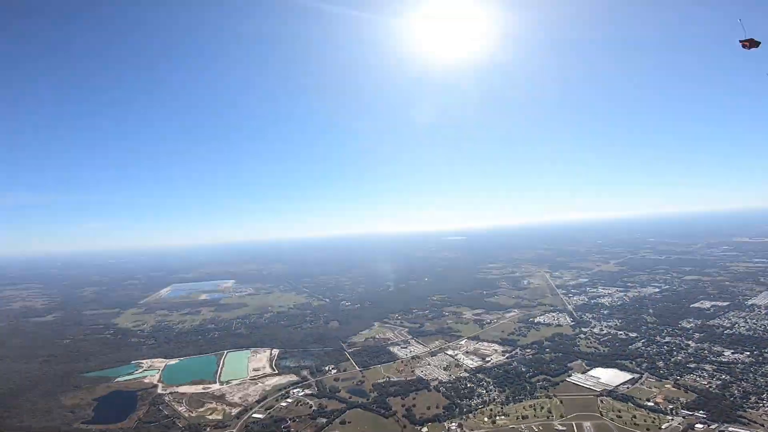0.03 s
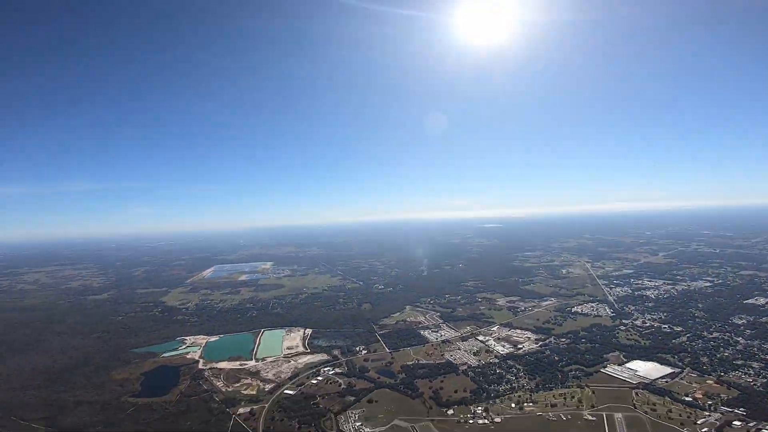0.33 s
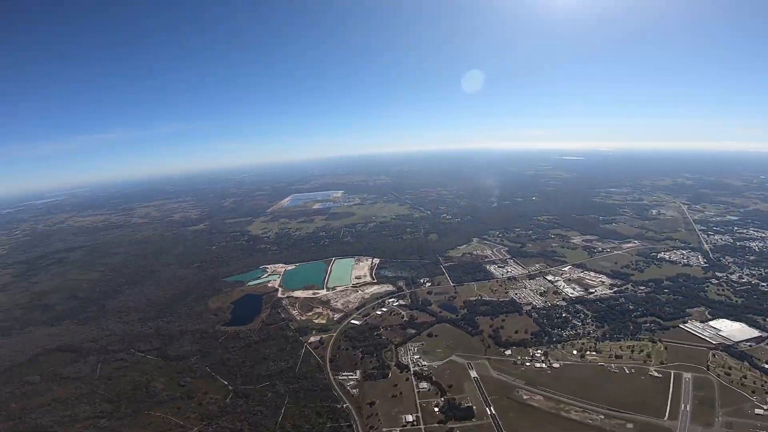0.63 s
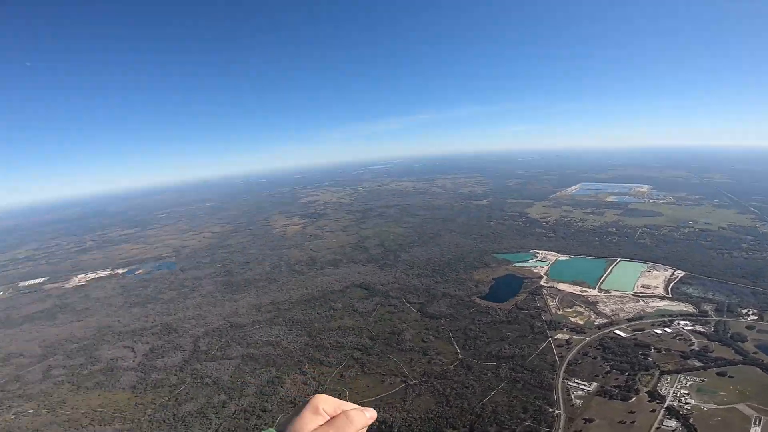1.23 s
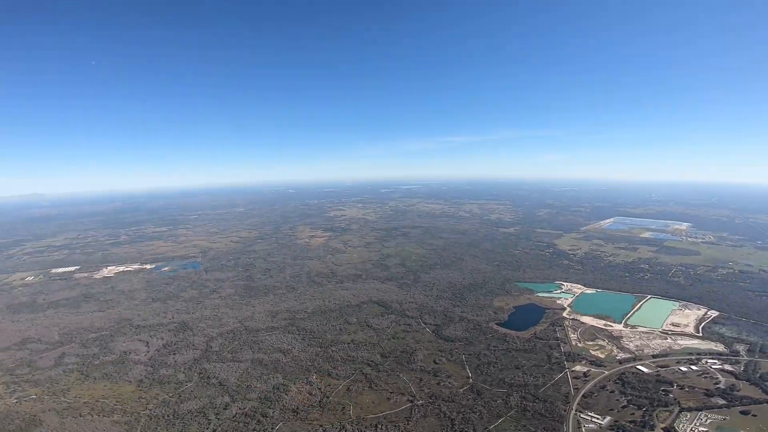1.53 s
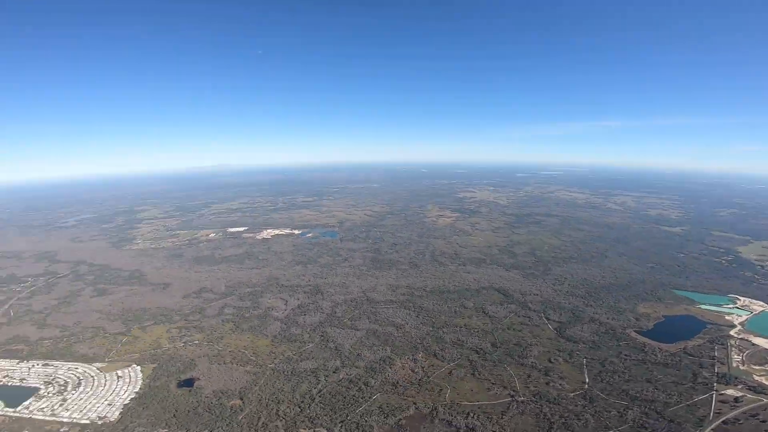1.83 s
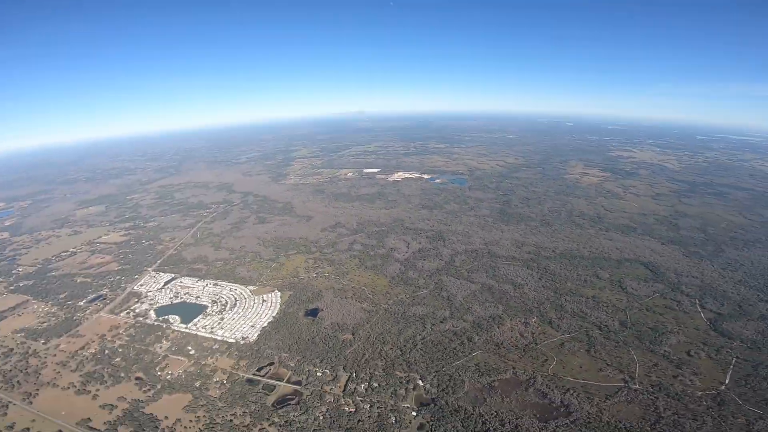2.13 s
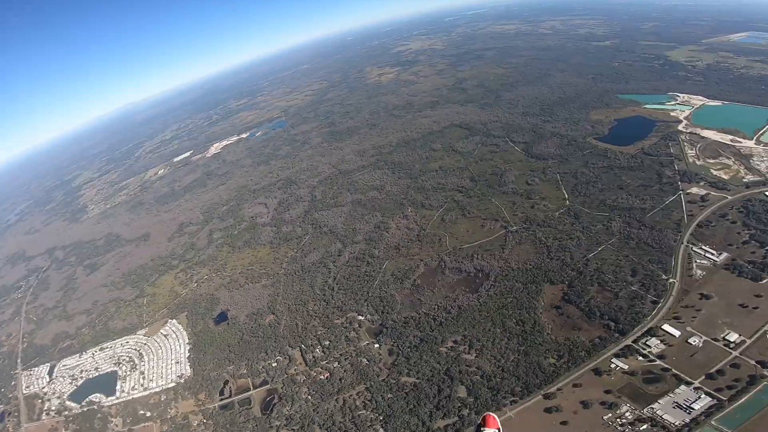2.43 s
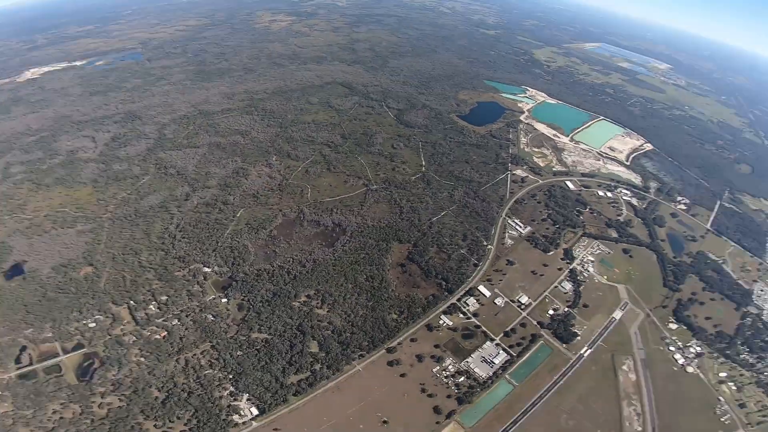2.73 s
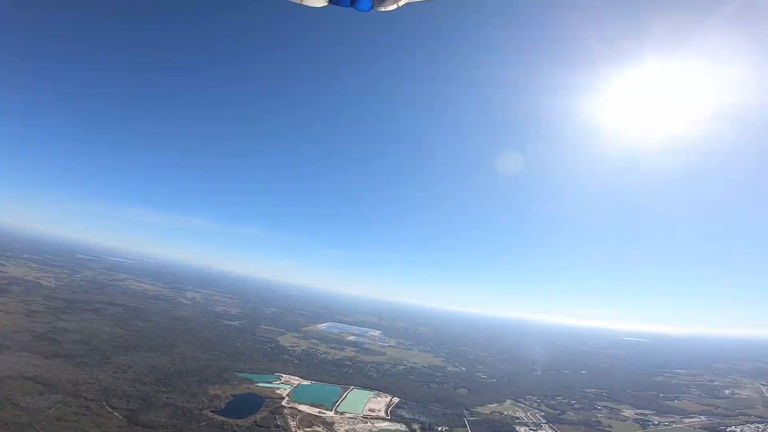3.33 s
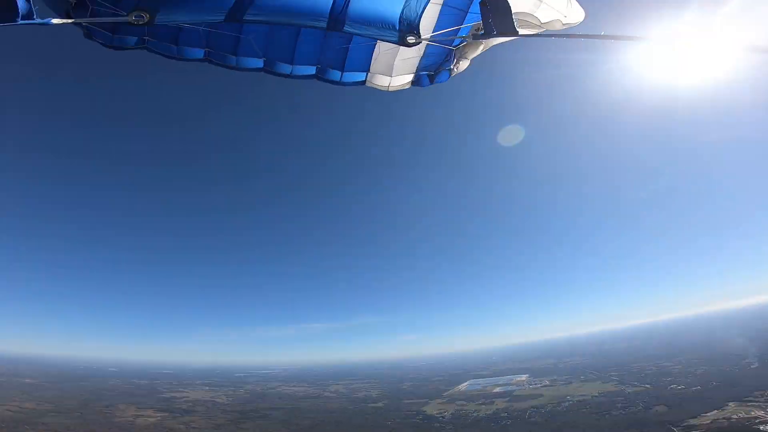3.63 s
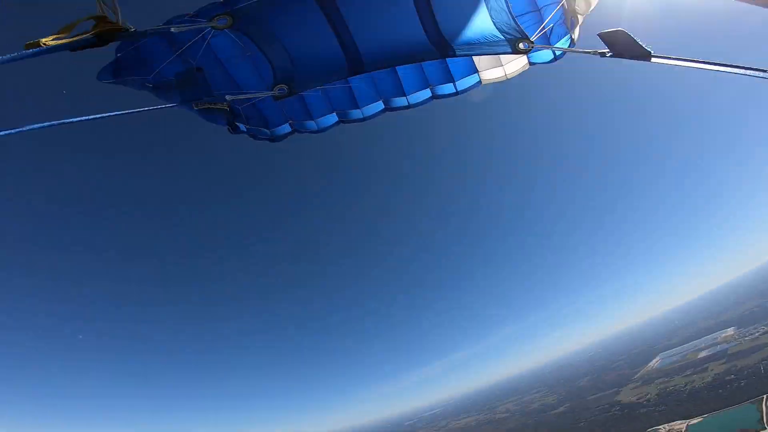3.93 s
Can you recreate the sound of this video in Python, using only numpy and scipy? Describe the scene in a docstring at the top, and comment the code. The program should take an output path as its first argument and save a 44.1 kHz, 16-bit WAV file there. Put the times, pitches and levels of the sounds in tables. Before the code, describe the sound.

Wind buffets a microphone high in open air, with low thumps, ragged flutter and tiny pops. After a few faint fabric rubs it drops into a brief, hollow lull, then rushes back as the parachute dives.

```python
"""In open air under a parachute, swinging through a turn: one microphone on a small carried camera.
Eddies thump and roar right on the mic; gusts tear at it, spit as they break on the port and whistle
as they slide off. Harness fabric scrapes past, close by. The port falls into the lee for a moment,
leaving faint hollow air tones; then the dive picks up speed and the rush swells again."""
import sys
import numpy as np
from scipy import signal
from scipy.fft import rfft, irfft
from scipy.io import wavfile
from scipy.ndimage import uniform_filter1d

SR = 44100
rng = np.random.default_rng(int(sys.argv[2]) if len(sys.argv) > 2 else 0)


def dump_mix(stems):
    """Bounce the given channels to the path in sys.argv[1] as a 16-bit WAV at rate SR."""
    frames = np.atleast_2d(stems).T  # one column per channel
    limited = np.clip(frames, -1, 1)  # hard clip at full scale
    pcm = np.round(limited * 32767).astype(np.int16)
    wavfile.write(sys.argv[1], SR, pcm)


N = 176400
TIME = np.arange(N) / SR


def from_db(db):
    """Decibels to gain."""
    return 10 ** (np.asarray(db) / 20)


def rms_one(x):
    """Scale to unit power."""
    return x / np.sqrt(np.mean(x ** 2) + 1e-20)


def in_time(rows):
    """Join (time [s], value) points into a curve at every sample."""
    return np.interp(TIME, *np.transpose(rows))


def butter(x, order, hz, kind):
    """Causal low- or high-pass."""
    return signal.sosfilt(signal.butter(order, min(hz, .45 * SR), kind, fs=SR, output="sos"), x)


def drift(hz):
    """Smooth random wander up to about this rate; rms 1."""
    return rms_one(butter(rng.standard_normal(N + SR), order=2, hz=hz, kind="low")[SR:])


def noise(colour):
    """Noise with a spectrum of (frequency [Hz], relative level [dB]) points; rms 1."""
    hz, db = np.transpose(colour)
    bin_hz = np.maximum(np.arange(N // 2 + 1) * SR / N, 1)
    gain = from_db(np.interp(np.log(bin_hz), np.log(hz), db)) * (bin_hz > 10)
    return rms_one(irfft(rfft(rng.standard_normal(N)) * gain, N))


def evened(x, span_s):
    """Hold the power near 1 over this span, leaving the quicker lumps."""
    size = max(int(span_s * SR), 2)
    power = uniform_filter1d(uniform_filter1d(x ** 2, size), size)
    return x / np.sqrt(np.abs(power) + 1e-12)


def swell(peak_s, length_s, db):
    """A bell-shaped rise and fall of gain."""
    return from_db(db) * np.exp(-(2 * (TIME - peak_s) / length_s) ** 2)


def air_tone(glide, q):
    """Smooth flow noise in a gliding, steep-sided resonance; q is centre over width."""
    s, hz, db = np.transpose(glide)
    flow, tone, state = rng.standard_normal(N), np.zeros(N), np.zeros((2, 2))
    for block in np.array_split(np.arange(N), N // 128):
        centre_hz = np.interp(TIME[block[0]], s, hz)
        radius = np.exp(-np.pi * centre_hz / q / SR)
        poles = [1, -2 * radius * np.cos(2 * np.pi * centre_hz / SR), radius ** 2]
        band_pass = [(1 - radius ** 2) / 2, 0, (radius ** 2 - 1) / 2] + poles
        low_pass = [sum(poles), 0, 0] + poles
        tone[block], state = signal.sosfilt([band_pass, low_pass], flow[block], zi=state)
    softened = butter(tone, order=3, hz=6570, kind="low")
    return from_db(np.interp(TIME, s, db)) * evened(softened, span_s=0.15)


def open_air():
    """Air around the camera: two hollow tones in the lull, then a swish and the smooth rush of the dive."""
    # the rush as the dive gathers speed: (time [s], level [dB])
    rush_level = [(3.0, -76), (3.15, -61), (3.28, -51.5), (3.4, -42.5), (3.54, -41), (3.68, -45.5),
                  (4, -45)]
    # its spectrum: (frequency [Hz], relative level [dB])
    rush_colour = [(500, -8.5), (1100, 8.5), (1700, 5), (2400, -8), (2900, -1), (4000, -5), (5500, -11),
                   (7000, -17.5), (9000, -23), (11000, -35.5), (15000, -67.5)]
    # a swish that sinks as the flow swings onto the port: (time [s], centre [Hz], level [dB])
    swish = [(3.28, 3030, -88), (3.35, 2870, -48.5), (3.39, 2760, -43), (3.43, 1460, -37),
             (3.47, 1090, -33), (3.55, 1050, -41.5), (3.62, 755, -32), (3.72, 600, -84)]
    # hollow lower tone: (time [s], centre [Hz], level [dB])
    lower_tone = [(2.88, 560, -58), (2.96, 670, -57), (3.02, 790, -51), (3.09, 770, -59), (3.2, 736, -63),
                  (3.27, 730, -47), (3.36, 740, -73)]
    # airy upper tone: (time [s], centre [Hz], level [dB])
    upper_tone = [(2.8, 1980, -69), (2.99, 2200, -64), (3.27, 2370, -57), (3.36, 2380, -50)]
    rush = from_db(in_time(rush_level)) * noise(rush_colour)
    return rush + air_tone(swish, q=1) + air_tone(lower_tone, q=3.2) + air_tone(upper_tone, q=3.2)


def scrapes(width_octaves=0.4):
    """Harness fabric rubs past the camera in short, bright strokes, each in its own band."""
    # fabric strokes: (peak time [s], length [s], level [dB], centre [Hz])
    strokes = [(2.391, 0.056, -48, 2850), (2.476, 0.013, -48, 4200), (2.531, 0.014, -46, 4050),
               (2.718, 0.009, -58, 3850), (2.845, 0.0084, -48, 1790), (2.875, .018, -62.5, 4130),
               (3.416, .03, -52, 4200)]
    edge_ratio = 2 ** (width_octaves / 2)
    friction, out = rng.standard_normal(N), np.zeros(N)
    for peak_s, length_s, db, hz in strokes:
        band = butter(friction, order=6, hz=hz * edge_ratio, kind="low")
        band = butter(band, order=6, hz=hz / edge_ratio, kind="high")
        out += swell(peak_s, length_s, db) * evened(band, span_s=0.005)
    return out


def whistles(fall_octaves_per_s=2.6):
    """A narrow resonance sinks in pitch as a gust slides off the port."""
    # breathy whistles: (peak time [s], length [s], level [dB], pitch at the peak [Hz])
    breaths = [(1.283, 0.077, -38.5, 1460), (1.688, .085, -37.5, 1000)]
    out = np.zeros(N)
    for peak_s, length_s, db, hz in breaths:
        glide = [(peak_s + dt, hz * 2 ** (-fall_octaves_per_s * dt), 0) for dt in (-length_s, length_s)]
        out += swell(peak_s, length_s, db) * air_tone(glide, q=3.5)
    return out


def spits(pivot_hz=1000):
    """Eddies and fabric slap the port: puffs only milliseconds long, dull or crisp."""
    # slaps: (peak time [s], length [s], level [dB], tilt about the pivot [dB/octave])
    slaps = [(0.223, 0.0025, -12.5, -0.5), (.328, .006, -21, -2), (0.397, 0.0049, -11.5, -9.5),
             (0.423, 0.0056, -17, -4), (0.442, 0.0062, -22, -3), (0.494, .012, -15.5, -5.5),
             (0.528, .008, -24, -0.5), (.545, 0.0082, -14, -4), (0.596, .0035, -12, -4.5),
             (0.6227, 0.0044, -17, -3.3), (0.701, 0.0028, -21, -2), (0.725, 0.0054, -22, -3.5),
             (.962, 0.0063, -19.5, -1), (1.291, .004, -31.5, 0), (1.4035, 0.0034, -19, -7.5),
             (1.4522, 0.0057, -20.5, -0.6), (1.476, 0.014, -25, -4), (1.521, 0.0038, -36, 3.5),
             (1.553, 0.0058, -25, 2), (1.582, 0.0044, -30, -1), (1.591, 0.0068, -26, 0),
             (1.613, 0.0065, -29, 2), (1.622, 0.0082, -27, 3), (1.665, .005, -25.5, -4),
             (1.726, .007, -27, -3.5), (1.799, 0.0064, -29, -3.5), (2.042, 0.0087, -28, -0.5),
             (2.063, 0.0019, -26.5, 3), (2.225, 0.0055, -32, 2), (2.497, 0.012, -30, -1),
             (2.562, 0.0043, -26, -4), (3.131, 0.0055, -40.5, -1), (3.547, 0.006, -25.5, 0),
             (3.755, .005, -24.5, -3.5)]
    # spectrum of a puff before its tilt: (frequency [Hz], relative level [dB])
    puff_colour = [(200, -14.5), (500, 9), (900, 2.5), (1700, -1), (2700, -8), (4000, -16), (5500, -27.5),
                   (7000, -36), (9500, -44.5), (13000, -59)]
    hz, colour_db = np.transpose(puff_colour)
    out = np.zeros(N)
    for peak_s, length_s, db, tilt in slaps:
        tilted = np.transpose([hz, colour_db + tilt * np.log2(hz / pivot_hz)])
        out += swell(peak_s, length_s, db) * evened(noise(tilted), span_s=0.0078)
    return out


def flutter(flap_hz=50, ripple_hz=193, ripple_share=0.46):
    """Eddies pass the port in uneven flaps with a fast ripple on them; a level swing in dB."""
    # unevenness of the flow, which each layer scales: (time [s], base spread [dB])
    spread = [(0, 2.5), (.45, 4), (.7, 3), (.8, 1), (1.2, 2.5), (1.35, 4), (2.35, 3.5), (2.6, 4),
              (3.35, -1), (4, 3)]
    lumps = np.sqrt(1 - ripple_share) * drift(flap_hz) + np.sqrt(ripple_share) * drift(ripple_hz)
    return in_time(spread) * 3 * np.tanh(lumps / 3)   # eases off the widest swings


def turbulence(colour, flutter_db):
    """Flow noise chopped by the passing eddies, its average power held steady."""
    return evened(noise(colour) * from_db(flutter_db), span_s=0.17)


def gusts(flutter_db):
    """Short ragged swells as the flow hits the port head on, each with its own brightness."""
    # gusts on the port: (peak time [s], length [s], level [dB], low-pass cutoff [Hz])
    blasts = [(0.023, 0.053, -17, 4350), (0.187, 0.14, -19, 1600), (0.481, 0.44, -26, 1280),
              (1.068, 0.29, -21.5, 2840), (1.212, 0.069, -21.5, 2210), (1.45, 0.013, -18, 990),
              (1.683, 0.086, -25, 1720), (1.726, 0.017, -21, 1890), (1.835, 0.034, -27.5, 1800),
              (2.028, 0.11, -28.5, 1840), (2.237, 0.048, -25.5, 1160), (2.405, 0.079, -30.5, 3000),
              (2.421, 0.0088, -19.5, 1400), (2.519, 0.06, -22.5, 1900), (3.641, 0.15, -25.5, 610),
              (3.795, 0.096, -23.5, 1500), (3.879, 0.11, -27, 655)]
    # spectrum of the flow before that low-pass: (frequency [Hz], relative level [dB])
    flow_colour = [(80, -20), (220, 4), (450, 5), (900, -4.5), (1500, -9.5), (2500, -15.5), (6000, -26.5),
                   (11000, -58)]
    flow, out = turbulence(flow_colour, flutter_db), np.zeros(N)
    for peak_s, length_s, db, cutoff_hz in blasts:
        dulled = butter(flow, order=3, hz=cutoff_hz, kind="low")
        out += swell(peak_s, length_s, db) * evened(dulled, span_s=length_s)
    return out


def airstream(flutter_db):
    """Roar, rasp and hiss of the flow right at the mic, all shaken by the same eddies."""
    # roar of the smaller eddies: (time [s], level before trim [dB])
    roar_level = [(0, -14), (.25, -18), (.37, -20.5), (.52, -14), (.64, -21.5), (.76, -13), (.92, -16.5),
                  (1.19, -13.5), (1.35, -22.5), (1.7, -19.5), (1.92, -24.5), (2.08, -18.5), (2.19, -27.5),
                  (2.33, -29), (2.42, -21.5), (2.46, -25), (2.53, -20), (2.7, -32.5), (2.77, -47),
                  (2.93, -44.5), (3.07, -70), (3.15, -43.5), (3.22, -54.5), (3.45, -30), (3.67, -16.5),
                  (3.76, -28.5), (3.88, -23.5), (4, -31)]
    # tearing rasp at the port between gusts: (time [s], level before trim [dB])
    rasp_level = [(0, -18), (0.25, -20), (0.55, -28), (0.67, -32.5), (0.76, -20.5), (0.9, -23.5),
                  (0.98, -23), (1.22, -33.5), (1.3, -28), (1.4, -36), (1.65, -30), (1.9, -35), (2.1, -31),
                  (2.33, -44), (2.55, -30.5), (2.7, -35.5), (2.76, -57), (2.95, -54), (3.22, -61),
                  (3.35, -36.5), (3.48, -25), (3.65, -27.5), (3.85, -35.5), (4, -28)]
    # hiss of the airstream: (time [s], level before trim [dB])
    hiss_level = [(0, -30), (.1, -38), (.45, -39), (.67, -47), (.78, -39), (.9, -42.5), (.97, -38),
                  (1.21, -38), (1.255, -52.5), (1.5, -53), (1.78, -47), (1.9, -52.5), (2.3, -53),
                  (2.52, -53.5), (2.63, -57), (2.78, -64), (3.1, -60), (4, -59)]
    # spectra of the three: (frequency [Hz], relative level [dB])
    roar_colour = [(60, -29.5), (110, -5), (150, -3), (220, -1.5), (300, -9.5), (450, -17), (700, -31.5),
                   (1500, -52), (4000, -79.5)]
    rasp_colour = [(150, -3), (330, 8.5), (480, 4), (700, 1.5), (1100, -4.5), (1800, -19), (3000, -32.5),
                   (6000, -42.5), (8800, -49), (12000, -78.5)]
    hiss_colour = [(300, -9), (800, 5.5), (1600, 4), (2800, -2), (3900, -5.5), (5200, -14.5), (6700, -20.5),
                   (9300, -25.5), (11300, -35), (14000, -72)]
    roar_trim_db, rasp_trim_db, hiss_trim_db = -1, -1.5, 5
    roar = from_db(in_time(roar_level) + roar_trim_db) * turbulence(roar_colour, 0.81 * flutter_db)
    rasp = from_db(in_time(rasp_level) + rasp_trim_db) * turbulence(rasp_colour, 1.4 * flutter_db)
    hiss = from_db(in_time(hiss_level) + hiss_trim_db) * turbulence(hiss_colour, 0.79 * flutter_db)
    return roar + rasp + hiss


def buffet(trim_db=0.5):
    """Large eddies push straight on the diaphragm in low, round thumps."""
    # pressure of the large eddies: (time [s], level before trim [dB])
    pressure = [(0, -19.5), (.15, -16), (.8, -19.5), (1.25, -16), (1.8, -16), (2.45, -18), (2.69, -21),
                (2.77, -40), (2.925, -39.5), (2.96, -46), (3.1, -54), (3.3, -46.5), (3.5, -31.5),
                (3.65, -31), (3.8, -31.5), (4, -39)]
    # spectrum of the thumps: (frequency [Hz], relative level [dB])
    thump_colour = [(10, -5.5), (24, -12.5), (42, -6), (68, -0.5), (110, -4), (150, -7.5), (250, -39),
                    (600, -97)]
    return from_db(in_time(pressure) + trim_db) * evened(noise(thump_colour), span_s=0.08)


def scene():
    """Wind and harness at the camera's one microphone."""
    flutter_db = flutter()
    on_the_mic = buffet() + airstream(flutter_db) + gusts(flutter_db) + spits()
    return (on_the_mic + open_air() + scrapes() + whistles())[None]


def record(dry):
    """The camera rounds off the highest pressure peaks and cuts the top of the treble."""
    ceiling, cutoff_hz = 0.8, 15700
    rounded = dry / (1 + (dry / ceiling) ** 8) ** (1 / 8)
    return signal.sosfilt(signal.cheby2(12, 70, cutoff_hz, fs=SR, output="sos"), rounded)


dry = scene()
out = record(dry)
dump_mix(out)
```